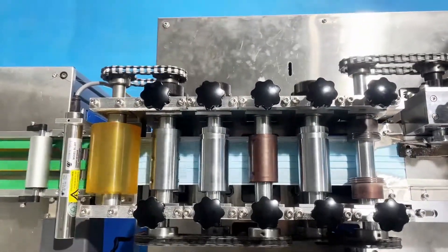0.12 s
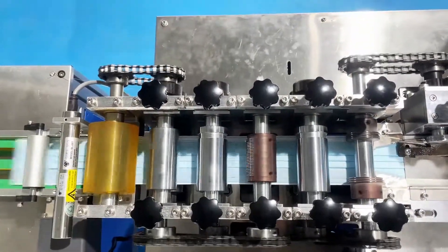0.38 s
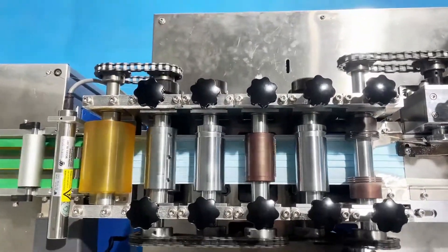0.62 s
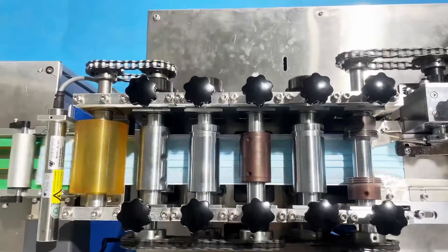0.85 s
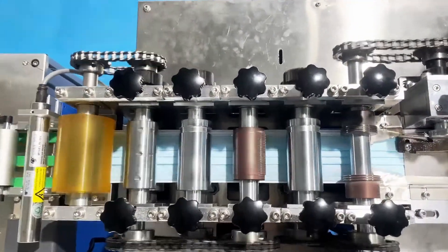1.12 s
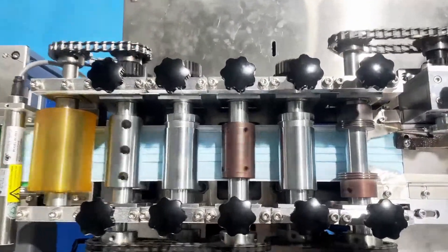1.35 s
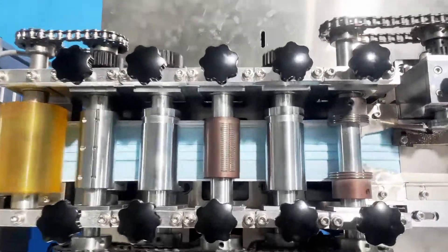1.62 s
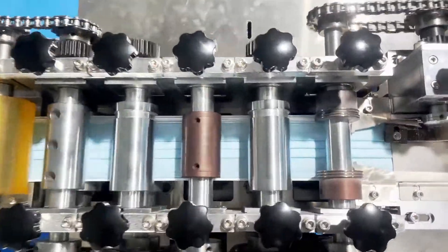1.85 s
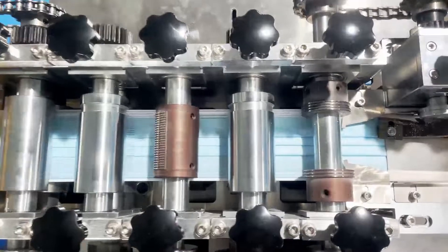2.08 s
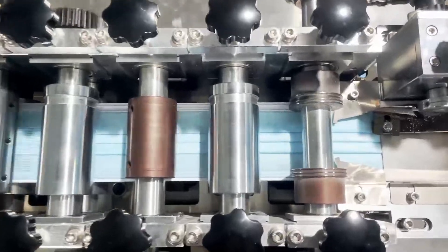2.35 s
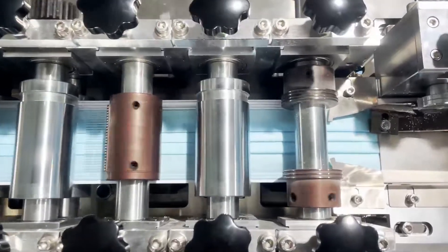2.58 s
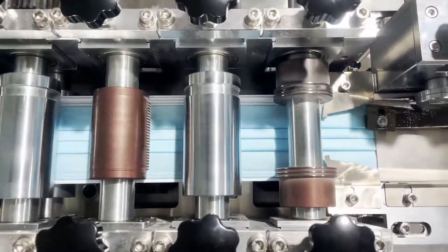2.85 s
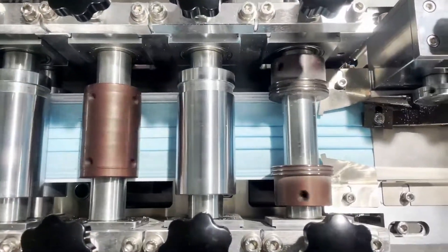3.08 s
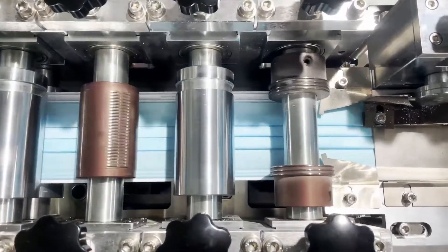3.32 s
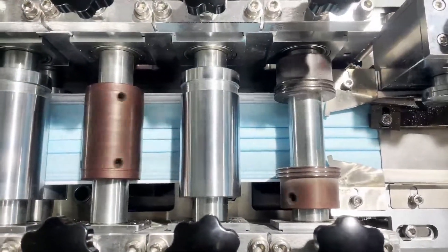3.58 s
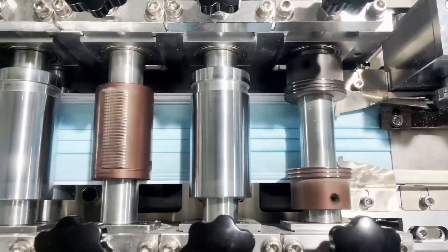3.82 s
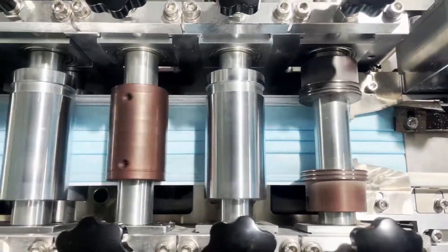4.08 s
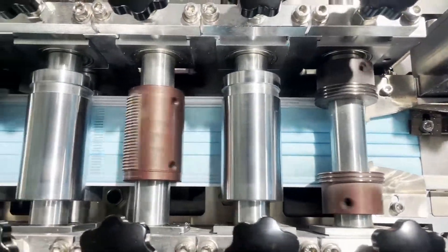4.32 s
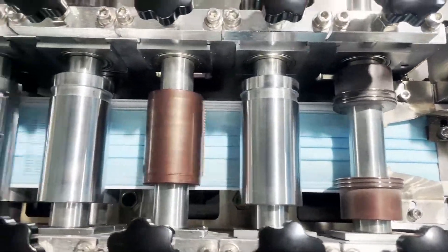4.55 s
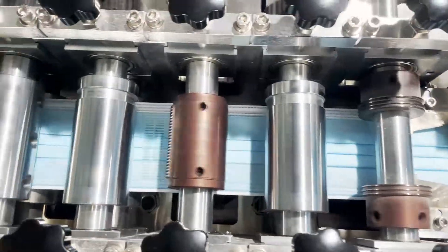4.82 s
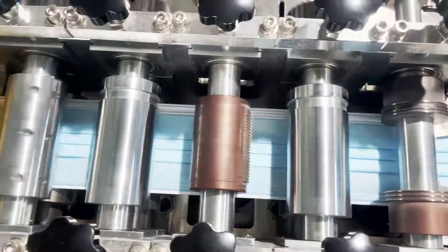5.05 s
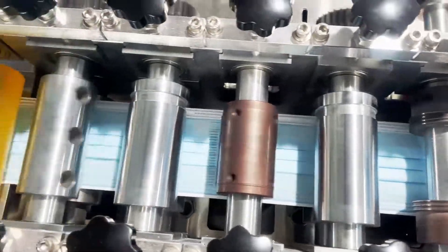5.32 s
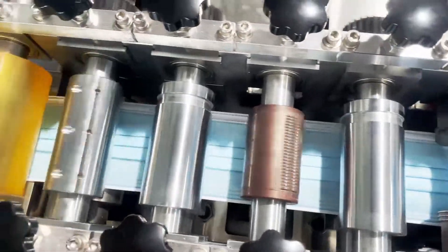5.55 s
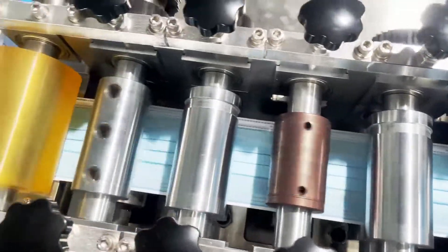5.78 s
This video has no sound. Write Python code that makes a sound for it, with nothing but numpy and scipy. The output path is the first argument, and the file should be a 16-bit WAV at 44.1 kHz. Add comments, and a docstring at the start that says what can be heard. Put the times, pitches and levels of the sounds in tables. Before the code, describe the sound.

Inside a factory hall, a mask-forming line is heard close up in phone stereo, with bass nearly centred. Restless low rumble, airy machine noise and thin, sputtering high whistles run throughout. The tail of a weld hiss and a soft low thud open the scene. Grainy, tonal weld hisses, each around a tenth of a second, return at about 0.5, 1.1, 1.65, 2.2, 2.8, 3.3, 3.9, 4.4, 5.0 and 5.6 seconds. Short high squeaks appear between 0.5 and 1.7, and a double soft thud lands at 1.7. From about 1.9 a piercing, rapidly throbbing whine arrives in uneven bursts, briefly roughening and rising each cycle, shifting left and right, with short gaps near 2.4 and 5.3, ending around 5.8. A low hum pulses beneath it. Dry contact clicks scatter throughout, clustering near 4.8, with a stronger one at 5.6, over faint chain ticking.

```python
"""A rumbling hall, a thin top whistle, the tail of a weld and a soft thud open the scene on a mask-forming line.
Short squeaks, then a throbbing whine follow, over a hum at the throb rate: a phone's two ports hear ultrasonic
horns overload its microphones, built here as trembling sines and a comb of lines. About once a cycle a weld
hisses, as noise coloured by narrow tones. Contacts tick as tiny noise bursts; thuds ring on decaying sines."""
import sys
import numpy as np
from scipy import signal
from scipy.fft import rfft, irfft, next_fast_len
from scipy.io import wavfile
from scipy.ndimage import uniform_filter1d, map_coordinates

SR = 44100
rng = np.random.default_rng(int(sys.argv[2]) if len(sys.argv) > 2 else 0)


def field_ratio(decibels):
    """Amplitude ratio for a level in dB (20 dB per decade); scalars and array-likes work."""
    return 10 ** (np.asarray(decibels, dtype=float) / 20)


def int16_out(signal):
    """Quantize to a 16-bit WAV file."""
    q = np.round(np.clip(np.atleast_2d(signal).T, -1, 1) * 32767)
    wavfile.write(sys.argv[1], SR, q.astype(np.int16))


N = 261072
T = np.arange(N) / SR

# likeness of noise at the two ports: pitch_hz, likeness (0 to 1)
PORT_LIKENESS = [(500, .9), (800, .8), (1200, .5), (4000, .55), (6800, .75), (7600, .99), (15000, .995)]
# phase turn between the ports: pitch_hz, phase_rad
PORT_PHASE = [(0, 0), (2000, -.2), (2500, .7), (4200, .1), (5000, .6), (6000, -.4), (6800, -1.35),
              (8100, -np.pi), (14900, -3 * np.pi)]

# hall floor: time_s, rumble_db, body_db
HALL_LEVELS = [(0.0, -59.5, -58), (0.49, -60.5, -61), (0.74, -55, -56), (0.99, -59, -60),
               (1.84, -56.5, -57), (2.3, -53, -57), (2.97, -50.5, -59), (3.92, -54.5, -56.5),
               (4.3, -51, -58.5), (4.75, -55.5, -56), (4.96, -45, -54.5), (5.23, -57, -55),
               (5.62, -49.5, -55.5), (5.92, -60, -56)]
# hall noise colour within each band: pitch_hz, relative_db
HALL_COLOUR = [(60, -4.5), (200, -1.5), (400, -2.5), (900, -6), (1600, -9), (3000, -11), (4500, -9.5),
               (6000, -17), (7600, -14), (9600, 3), (11000, -67), (12400, 4.5), (13800, 1), (14600, -48)]

# the louder contact ticks: start_s, level_db (before boost and colour)
TICKS = [(0.2388, -36), (0.7991, -34.5), (0.9317, -35), (1.1842, -35.5), (1.3632, -34.5), (1.4341, -40),
         (1.6694, -28), (1.8441, -39), (2.0008, -42), (2.0626, -36.5), (2.4283, -38.5), (2.554, -33),
         (2.5769, -36), (2.8694, -34), (3.08, -40), (3.1212, -31), (3.1397, -30.5), (3.657, -32),
         (4.122, -31.5), (4.2237, -31.5), (4.2456, -35), (4.2776, -38), (4.755, -30), (4.782, -33),
         (4.812, -28.5), (4.8273, -30), (4.8588, -29), (4.9935, -30), (5.1735, -33.5), (5.3566, -32),
         (5.39, -34), (5.417, -36.5), (5.5904, -33), (5.6115, -23), (5.8435, -33.5)]
# tick colour: pitch_hz, gain_db
TICK_COLOUR = [(300, 4), (1500, -1), (3000, -2.5), (7000, -6), (12000, -7), (13300, 3), (14300, -53)]

# landing parts: start_s, level_db (scales all the modes)
THUDS = [(0.031, -53), (1.705, -51), (1.724, -49.5)]
# ringing modes of the frame: pitch_hz, relative_db, decay_s (to -60 dB)
THUD_MODES = [(289, 9, 0.2), (349, 12, 0.07), (500, -11, 0.059)]

# squeaks of the whine before the horns lock: start_s, length_s, level_db
SQUEAKS = [(0.524, 0.13, -46), (0.663, 0.098, -44), (0.802, 0.019, -40), (1.097, 0.107, -45),
           (1.38, 0.02, -48.5), (1.65, 0.033, -56)]

# hum at the throb rate: time_s, level_db (rms)
HUM_LEVEL = [(0.0, -63.5), (0.4, -79), (0.64, -49), (0.71, -62.5), (0.77, -58), (0.87, -81), (1.17, -60.5),
             (1.53, -69), (2.26, -55.5), (2.29, -43.5), (2.46, -80), (2.51, -48.5), (2.75, -63),
             (2.82, -45.5), (3.31, -55), (3.61, -40), (3.66, -52.5), (4.75, -48.5), (5.06, -37),
             (5.14, -60), (5.49, -47.5), (5.56, -71), (5.72, -44), (5.92, -81)]
# octave of the hum: time_s, level_db (peak, before its flutter)
HUM_OCTAVE_LEVEL = [(0.0, -79), (0.03, -68), (0.51, -86), (0.61, -57), (1.02, -90), (1.19, -48), (1.3, -83),
                    (2.31, -51.5), (2.36, -78), (2.65, -55), (3.68, -54.5), (3.71, -44), (4.04, -62.5),
                    (4.78, -59.5), (4.91, -48), (5.28, -63.5), (5.59, -49.5), (5.92, -70.5)]

# lower whistle: time_s, level_db (left-right mean)
LOW_WHISTLE_LEVEL = [(0.0, -58), (2.78, -63), (4.25, -60.5), (5.09, -66.5), (5.18, -58.5), (5.41, -60),
                     (5.52, -58), (5.92, -62.5)]
# upper whistle: time_s, level_db (left-right mean)
HIGH_WHISTLE_LEVEL = [(0.0, -71), (0.18, -57), (0.58, -63), (0.69, -42), (0.77, -65), (0.81, -50),
                      (1.73, -53), (1.78, -67), (1.83, -44.5), (1.96, -72), (2.04, -58.5), (2.52, -49),
                      (2.97, -85), (3.15, -42.5), (3.23, -63), (3.54, -84), (3.68, -43), (3.77, -69),
                      (4.07, -47.5), (4.6, -76), (4.8, -48.5), (5.16, -62), (5.41, -43.5), (5.44, -64),
                      (5.87, -53.5), (5.92, -68)]

# welds: start_s, length_s (four lower bands), body_db (third band), middle_db (second band over the body),
# treble_db (fifth band), swell_db (start to end); all band levels are before the swell
WELDS = [(-0.03, 0.11, -58.5, -6, -49, 4.5), (0.532, .12, -46, -1.5, -49, 7),
         (1.096, 0.1, -44, -1.5, -47, 4.5), (1.646, 0.047, -53.5, -0.5, -48.5, -2.5),
         (2.2, .12, -43.5, -2.5, -45.5, -2.5), (2.761, .13, -46.5, 0.5, -57, -0.5),
         (3.317, .12, -46, -2.1, -60, 2), (3.877, .12, -44.5, -2, -46, -2.5),
         (4.435, .13, -45.5, -1.7, -54, -2.1), (4.995, .13, -44.5, -1.5, -51.5, -2.1),
         (5.561, .13, -44.5, 1, -46, -4)]
# weld hiss colour within each band: pitch_hz, relative_db
WELD_HISS = [(150, 5), (400, -2.5), (800, 1.5), (1300, 0.5), (2100, -2.5), (3200, -9.5), (5300, 0),
             (6100, 1), (7600, -4.5), (8600, -28), (10000, -3), (11400, -11), (13600, -28), (14300, -41)]
# narrow tones in the hiss: pitch_hz, width_hz, relative_db (on the scale of the hiss colour)
WELD_TONES = [(1768, 280, 6), (2488, 89, 8.5), (2643, 37, 6.5), (4960, 110, 6), (6800, 314, 15.5),
              (8950, 31, 14.5), (10620, 13, 11.5), (12420, 260, -1), (15340, 200, 19.5)]
# weld balance: pitch_hz, left_over_right_db
WELD_BALANCE = [(60, 0.0), (120, 0.0), (240, -17), (480, -13), (950, 3), (1890, -0.5), (3770, 6.5),
                (7520, -1), (15000, 2)]
# edges of the six weld bands: edge_hz
WELD_EDGES = [100, 900, 2200, 4300, 8600, 13500, 15700]

# whine after the lock, one table for each stretch: time_s, level_db
WHINE_STRETCHES = [
    [(1.935, -44), (1.961, -37.5), (2.079, -47.5), (2.091, -33.5), (2.215, -39.5), (2.225, -46),
     (2.335, -38.5), (2.36, -60)],
    [(2.46, -44), (2.49, -31.5), (2.554, -34), (2.58, -45), (2.632, -35), (2.788, -44.5), (2.962, -32),
     (3.04, -38.5)],
    [(3.04, -37), (3.048, -37.5), (3.164, -33.5), (3.214, -44), (3.3, -50), (3.484, -36), (3.592, -35.5),
     (3.645, -47)],
    [(3.645, -48), (3.675, -32.5), (3.697, -31.5), (3.851, -48), (3.871, -41), (4.023, -37.5), (4.037, -56),
     (4.05, -53)],
    [(4.05, -52), (4.068, -42), (4.164, -33), (4.168, -28), (4.346, -36.5), (4.386, -32), (4.554, -42.5),
     (4.63, -39)],
    [(4.63, -40), (4.71, -30.5), (4.73, -34.5), (5.018, -33), (5.136, -44), (5.184, -31), (5.236, -47.5),
     (5.25, -58)],
    [(5.34, -41), (5.36, -31), (5.382, -46), (5.406, -33.5), (5.486, -38.5), (5.548, -31), (5.744, -41.5),
     (5.77, -59)],
]
# brief dips of the whine: centre_s, width_s (standard deviation), depth_db
WHINE_DIPS = [(2.585, 0.0077, 10), (3.845, 0.0047, 5), (4.238, 0.0086, 2)]
# whine balance: time_s, left_over_right_db
WHINE_BALANCE = [(0.5, -11), (0.56, 4.5), (2.12, -3), (2.18, 7.5), (2.31, 1), (3.05, -8.5), (3.17, 4),
                 (3.48, -4.0), (3.88, 0.5), (3.95, -6), (4.1, 1.5), (4.31, -4), (5.24, -0.5), (5.31, 5),
                 (5.65, -3.5), (5.8, 6)]
# whine centre before slips and wander: time_s, pitch_hz
WHINE_CENTRE = [(0.5, 4230), (1.9, 4350), (2.12, 4252), (2.33, 4360), (2.55, 4296), (2.72, 4264),
                (2.85, 4270), (3.0, 4264), (3.27, 4228), (3.5, 4340), (3.63, 4260), (3.72, 4276),
                (4.0, 4303), (4.36, 4233), (4.6, 4276), (4.95, 4282), (5.12, 4374), (5.2, 4314),
                (5.45, 4290), (5.62, 4270), (5.8, 4250)]

COMB_HZ, THROB_HZ, HUM_HZ = 4227.9, 73.8, 73.0
CYCLE_S, SLIP_S = .5585, .285  # machine cycle; offset of the slips within it
LOCK_S, STEADY_S = 1.9, 2.55  # the horns lock; the lower whistle steadies


def unit(x):
    """Scale to rms 1 for the mean of the channels."""
    return x / np.sqrt(np.mean(np.atleast_2d(x).mean(0) ** 2) + 1e-20)


def along(points, hz):
    """Read a table of pitch and value on a log pitch axis."""
    f, v = np.transpose(points)
    return np.interp(np.log(hz + 1), np.log(f + 1), v)


def curves(rows):
    """Draw one value per sample for each column after the time."""
    s, *cols = np.transpose(rows)
    return np.array([np.interp(T, s, c) for c in cols])


def bursts(tables):
    """Join and smooth the tables, with a soft gate that opens only inside them."""
    gate = sum((T >= rows[0][0]) & (T < rows[-1][0]) for rows in tables)
    values = uniform_filter1d(curves(np.vstack(tables)), size=260, axis=1)
    return values, uniform_filter1d(gate * 1., size=300)


def wobble(rate, channels=1):
    """Smooth random curves with rate knots a second."""
    knots = rng.standard_normal((channels, int(N * rate / SR) + 4))
    return np.array([map_coordinates(k, [T * rate]) for k in knots])


def filtered(x, response):
    """Shape x by a complex response of frequency."""
    m = next_fast_len(N + 8192)
    return irfft(rfft(x, m) * response(np.fft.rfftfreq(m, 1 / SR)), m)[..., :N]


def ports(pair):
    """The path between the two ports turns the phase, half on each side."""
    def turn(hz):
        phase = np.interp(hz, *np.transpose(PORT_PHASE))
        return np.exp(np.outer([.5j, -.5j], phase))
    return filtered(pair, turn)


def sides(db):
    """Left and right gains for a balance in dB."""
    return field_ratio(np.array([db / 2, -db / 2]))


def rush(gain, patchy_db):
    """Patchy stereo noise, alike at the two ports by an amount that depends on frequency."""
    z = signal.stft(rng.standard_normal((2, N)), nperseg=512)[2]
    # random patches, smoothed over frequency and then over time
    field = uniform_filter1d(rng.standard_normal(z.shape[1:]), size=5, axis=0)
    field = uniform_filter1d(field, size=6, axis=1)
    pair = signal.istft(z * field_ratio(patchy_db * field / field.std()), nperseg=512)[1][:, :N]

    def mid_side(hz):
        angle = np.arccos(np.clip(along(PORT_LIKENESS, hz), 0, 1)) / 2
        return np.array([np.cos(angle), np.sin(angle)])
    mid, side = filtered(pair, mid_side)
    return ports(filtered(np.array([mid + side, mid - side]), gain))


def band(x, lo_hz, hi_hz):
    """One band with soft edges, rms 1."""
    return unit(filtered(x, lambda hz: 1 / (1 + (lo_hz / (hz + 1)) ** 16) / (1 + (hz / hi_hz) ** 16)))


def tone(hz, blur_hz, channels=1):
    """A sine whose pitch trembles quickly."""
    trembling_hz = hz + blur_hz * wobble(260, channels)
    return np.sqrt(2) * np.sin(2 * np.pi * np.cumsum(trembling_hz, axis=1) / SR)


def hall():
    """Other machines blur into restless noise: an uneven, throbbing rumble, a body and a drifting top hiss."""
    rumble_db, body_db = curves(HALL_LEVELS)
    air_db = -67.5 + 3 * wobble(2.92)
    noise = rush(lambda f: field_ratio(along(HALL_COLOUR, f)), patchy_db=3.0)
    noise = noise * field_ratio(1.09 * wobble(25) + 0.81 * wobble(90))
    throb = 1 + 0.17 * np.sin(2 * np.pi * HUM_HZ * T + wobble(8.3))
    rumble = field_ratio(rumble_db + 0.54 * wobble(11)) * throb * band(noise, 67, 902)
    body = field_ratio(body_db) * band(noise, 873, 8780)
    air = field_ratio(air_db) * band(noise, 10000, 12440)
    return rumble + body + air


def ticks():
    """Dry contacts: a one-sample click and a short decaying hiss, over many fainter ones from chains."""
    blows, t = np.zeros(N + 500), np.arange(400) / SR
    when, size = rng.random((2, 700))
    faint = np.transpose([when * T[-1], -54 + 12 * size ** 3])
    for s, db in np.vstack([TICKS, faint]):
        hiss = .3 * field_ratio(-60 * t / .009) * rng.standard_normal(len(t))
        click = .45 * (t == 0) * rng.choice([-1, 1])
        blows[round(s * SR):][:len(t)] += field_ratio(db + 13.0) * (hiss + click)
    pair = sides(2.5)[:, None] * blows[:N]
    return ports(filtered(pair, lambda hz: field_ratio(along(TICK_COLOUR, hz))))


def thuds():
    """A padded part lands and its frame rings low, as decaying sines with a softened onset."""
    out, t = np.zeros(N), np.arange(SR // 5) / SR
    for s, db in THUDS:
        ring = sum(field_ratio(level - 60 * t / t60) * np.sin(2 * np.pi * hz * t) for hz, level, t60 in THUD_MODES)
        out[round(s * SR):][:len(t)] += field_ratio(db) * ring * (1 - np.exp(-t / 0.0011))
    return out


def slips(wide_s=.025):
    """A smooth bump, 1 at the slip in each machine cycle and near 0 between."""
    cycles_away = ((T - SLIP_S) / CYCLE_S + .5) % 1 - .5
    return np.exp(-.5 * cycles_away ** 2 * (CYCLE_S / wide_s) ** 2)


def squeaks():
    """The level of the squeaks: each rises fast, holds and falls."""
    attack_s, release_s = .012, 0.04  # release: time to fall by 60 dB
    out = np.zeros(N)
    for s, long_s, db in SQUEAKS:
        rise = np.clip((T - s) / attack_s, 0, 1)
        fall_db = 60 * np.clip(T - s - long_s, 0, 1) / release_s
        out += rise * field_ratio(db - fall_db)
    return out


def hum():
    """The throb itself and its octave, unsteady in phase and size, the same at both ports."""
    first_db, second_db = curves(HUM_LEVEL), curves(HUM_OCTAVE_LEVEL)
    phase = 2 * np.pi * HUM_HZ * T + 1.1 * wobble(11)
    thump = band(rng.standard_normal(N), 38.0, 112)
    first = unit((np.sin(phase) + .35 * thump) * field_ratio(3.5 * wobble(10)))
    with_squeaks = field_ratio(-16) * uniform_filter1d(squeaks(), size=900)  # each squeak brings the hum with it
    octave = field_ratio(second_db + 2.5 * wobble(9.9)) * np.sin(2 * phase + 1.07 * wobble(23))
    return (field_ratio(first_db) + with_squeaks) * first + octave


def whistles():
    """Two rough tones near twice and three times the whine; they sputter and throb, the upper sags at each slip."""
    low_hz = 8813 + 70 * wobble(12)[0]
    high_hz = 13110 - 70 * slips() + 30 * wobble(3)[0]
    low_blur_hz = np.where(T < STEADY_S, 90, 45)
    out = np.zeros((2, N))
    for hz, db, blur_hz, flicker_db in ((low_hz, curves(LOW_WHISTLE_LEVEL), low_blur_hz, 2.5),
                                        (high_hz, curves(HIGH_WHISTLE_LEVEL), 45, 4.5)):
        throb = 1 + 0.5 * np.sin(2 * np.pi * THROB_HZ * T + wobble(9.1))
        sputter = field_ratio(flicker_db * wobble(17) + 3.9 * wobble(200))
        out += field_ratio(db) * unit(ports(tone(hz, blur_hz) * throb * sputter))
    return out


def weld_hiss():
    """Noise coloured by narrow tones, grainy and throbbing, split into six bands of rms 1."""
    def colour(f):
        tones = sum(field_ratio(db) ** 2 / (1 + (2 * (f - c) / w) ** 4) for c, w, db in WELD_TONES)
        return np.sqrt(field_ratio(along(WELD_HISS, f)) ** 2 + tones) * sides(along(WELD_BALANCE, f))
    grain = field_ratio(1.5 * wobble(150) + 1.3 * wobble(35))
    throb = 1 + .25 * np.sin(2 * np.pi * THROB_HZ * T)
    hiss = rush(colour, patchy_db=0.5) * grain * throb
    return np.array([band(hiss, *edges) for edges in zip(WELD_EDGES, WELD_EDGES[1:])])


def welds():
    """Each weld opens sharply above a slowly rising low body, swells or sinks, and stops with a short tail."""
    parts = weld_hiss()
    rise_s = np.array([[.09], [.025], [.006], [.006], [.008], [.008]])  # low band to top band
    out = np.zeros((2, N))
    for s, body_s, body_db, middle_db, treble_db, swell_db in WELDS:
        span = slice(max(round(s * SR), 0), round(s * SR) + SR // 3)
        t = T[span] - s
        lower_db = body_db + np.array([-1.5, middle_db, 0, -0.6])
        db = np.append(lower_db, [treble_db, -63])  # top band: same base level in every weld, before the swell
        length = np.array([body_s] * 4 + [0.12] * 2)[:, None]  # seconds; the two upper bands last alike
        after = np.clip(t - length, 0, 1)
        tail = .72 * field_ratio(-60 * after / .05) + .28 * field_ratio(-60 * after / .3)  # a quick stop, then the hall's answer
        swell = swell_db * (np.clip(t / length, 0, 1) - .5)
        rise = np.clip(t / rise_s, 0, 1)
        levels = rise * tail * field_ratio(db[:, None] + swell)
        out[:, span] += (levels[:, None] * parts[:, :, span]).sum(0)
    return out


def whine_comb(centre_hz):
    """Nine wavering lines one throb apart, strongest near the moving centre, evened out in level."""
    comb = np.zeros((2, N))
    for k in range(-4, 5):
        hz = COMB_HZ + k * THROB_HZ
        weight = np.exp(-.5 * ((hz - centre_hz) / 60) ** 2) + .04
        phase = 2 * np.pi * hz * T + .7 * wobble(40) + .8 * wobble(9, channels=2)
        flicker = field_ratio(3 * wobble(24) + 2 * wobble(14, channels=2))
        comb += weight * flicker * np.sin(phase)
    power = uniform_filter1d(comb.mean(0) ** 2 + comb.std(0) ** 2 / 3, size=3000)
    return comb / np.sqrt(np.abs(power) + 1e-9)


def whine():
    """Locked horns give a comb of lines; at each slip the lines melt into one rough tone, in a thin noise haze."""
    (db,), gate = bursts(WHINE_STRETCHES)
    db = db - sum(deep_db * np.exp(-.5 * ((T - s) / wide_s) ** 2) for s, wide_s, deep_db in WHINE_DIPS)
    pan_db, = curves(WHINE_BALANCE)
    centre_hz = curves(WHINE_CENTRE)[0] + 100 * slips(0.042)  # the centre jumps up at each slip
    centre_hz = centre_hz + 15 * wobble(6.5, channels=2)  # each port hears its own centre
    comb = whine_comb(centre_hz)
    early = T < LOCK_S
    melt = np.maximum(slips(), .8 * early)  # before the lock the whine is mostly the rough tone
    rough = tone(centre_hz, 42, channels=2) * field_ratio(3 * wobble(70))
    noise = rng.standard_normal((2, N))
    haze = (.16 + .1 * early) * band(noise, 4050, 4550) + .018 * band(noise, 3700, 5200)
    level = gate * field_ratio(db) + squeaks()
    return level * sides(pan_db) * ((1 - melt) * comb + melt * rough + haze)


def scene():
    """All sources at the two ports."""
    return hall() + ticks() + thuds() + hum() + whistles() + welds() + whine()


def low_pass(x):
    """Removes everything above the highest recorded frequency."""
    return signal.sosfilt(signal.butter(12, 15720, fs=SR, output="sos"), x)


def record(dry):
    """The phone keeps its bass in mono: the side signal fades out below about 640 Hz."""
    mid = dry.mean(0)
    side = filtered(dry[0] - mid, lambda hz: 1 / (1 + (640 / (hz + 1)) ** 6))
    return low_pass(np.array([mid + side, mid - side]))


dry = scene()
out = record(dry)
int16_out(out)
```